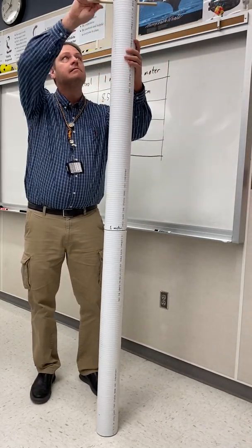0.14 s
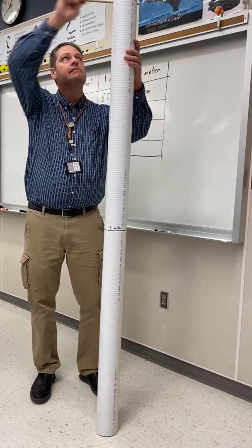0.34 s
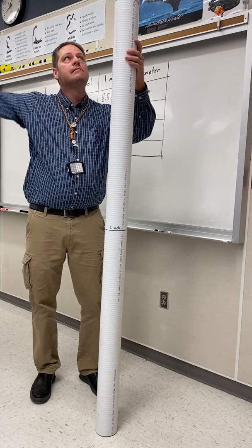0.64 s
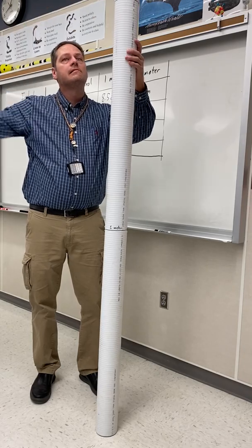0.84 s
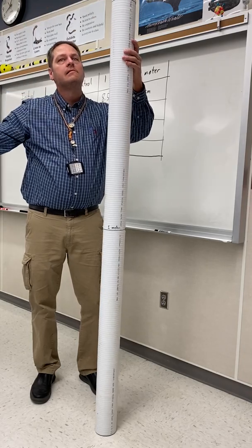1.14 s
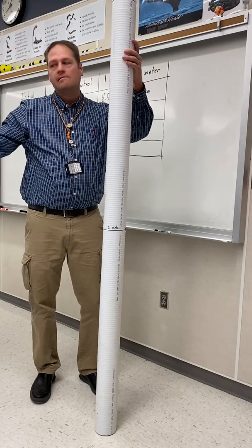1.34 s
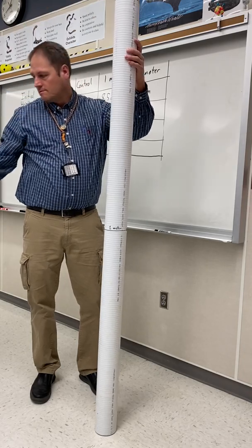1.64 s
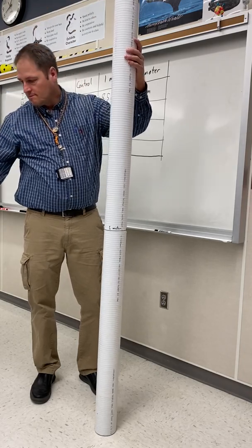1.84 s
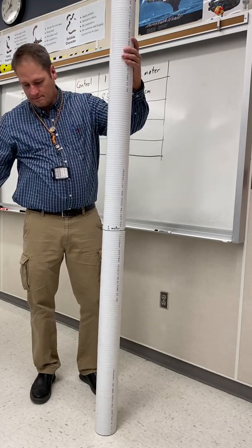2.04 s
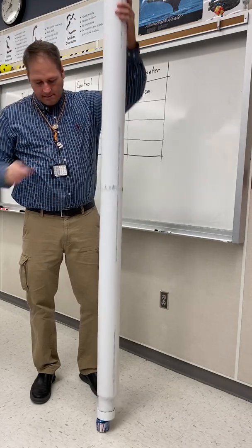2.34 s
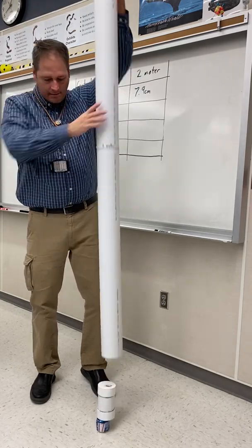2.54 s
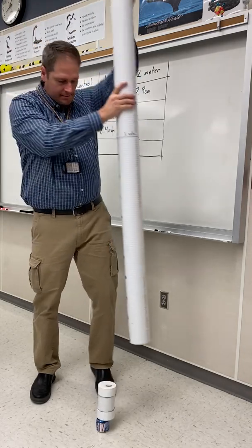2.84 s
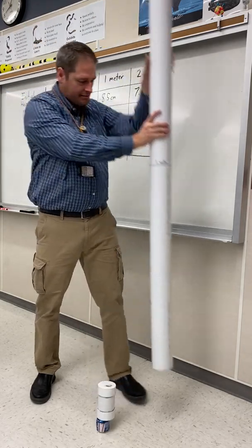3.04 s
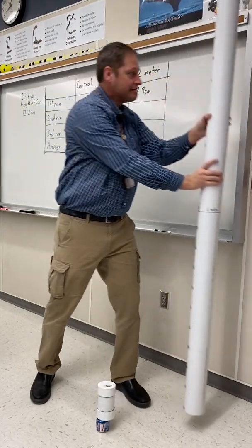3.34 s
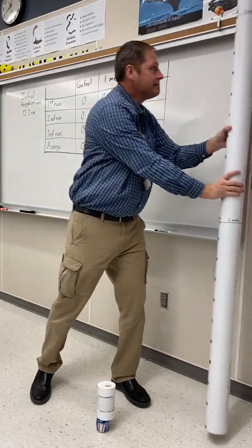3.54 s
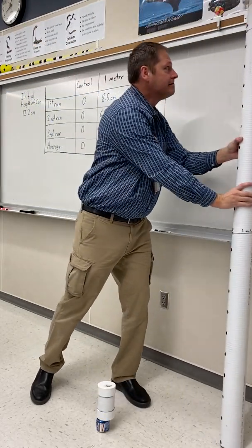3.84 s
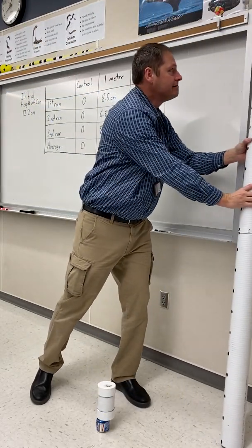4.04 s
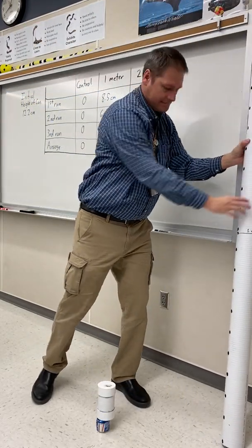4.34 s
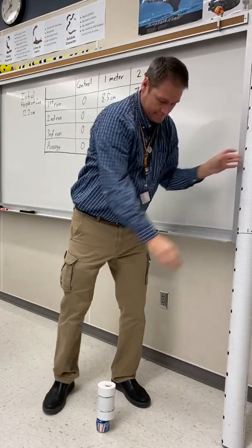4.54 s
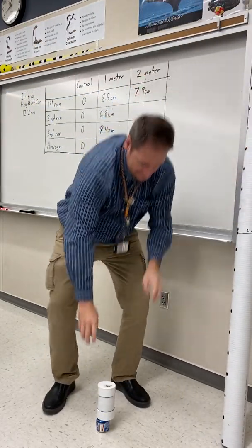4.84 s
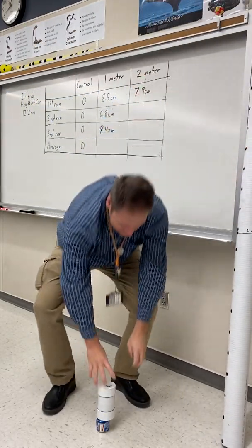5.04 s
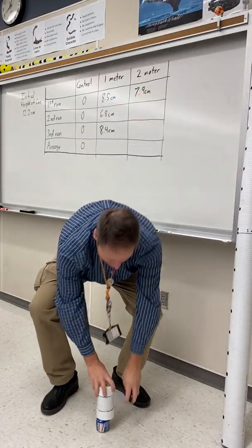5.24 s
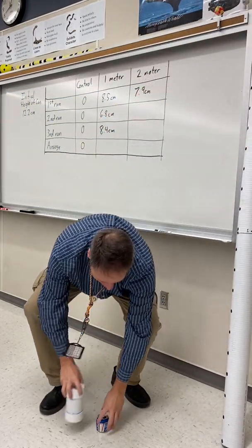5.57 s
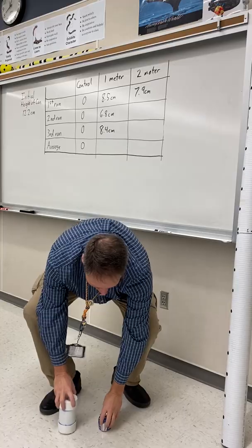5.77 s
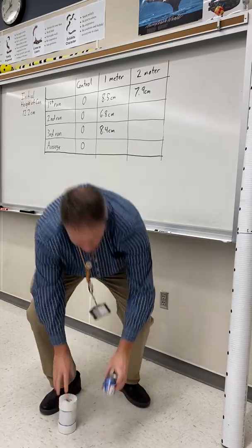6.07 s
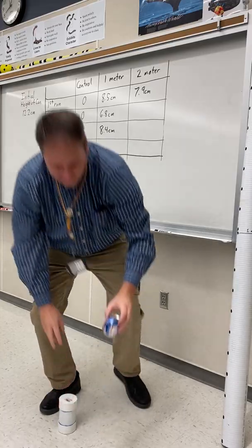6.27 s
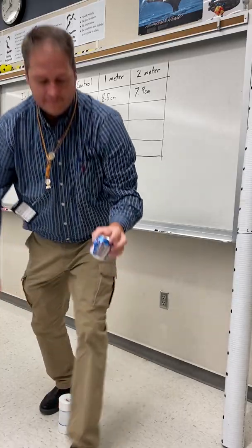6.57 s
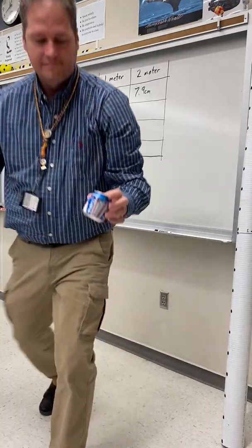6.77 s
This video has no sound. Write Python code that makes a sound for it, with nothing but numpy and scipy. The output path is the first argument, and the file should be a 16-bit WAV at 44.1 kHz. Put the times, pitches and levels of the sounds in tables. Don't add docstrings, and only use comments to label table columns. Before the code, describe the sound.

A hard-walled classroom with steady low ventilation noise and a faint tonal hum. From about 0.35 s a steel peg is jerked out of a tall plastic pipe: stuttering hollow scrapes, a strong rattle near 0.45 and smaller catches to 0.82. At 0.88 a weight slides free, its scrape and pipe resonance swelling quickly, with a wall hit at 1.05, then a very loud crack and crunching thud on a can at 1.12. Rebound blows follow at 1.26 and 1.29 within a ringing room tail. At 1.9 the peg lands, bright and metallic, bouncing until 2.08. From 2.2 come dull pipe scuffs, hollow hums and dry hand rustle; knocks at 3.76-3.94, a thump at 4.14, a sharp scuff at 4.4. The weight is lifted softly at 5.3, the can gripped at 5.77, the weight clacks down at 5.87. Faint knocks and rustle, then tiny can taps at 6.72-6.76.

```python
import sys
import numpy as np
from scipy import signal
from scipy.fft import rfft, irfft, next_fast_len
from scipy.io import wavfile
from scipy.ndimage import uniform_filter1d, map_coordinates

SR = 44100
rng = np.random.default_rng(int(sys.argv[2]) if len(sys.argv) > 2 else 0)


def nominal_scale(level):
    x = np.asarray(level, float) / 20
    return 10 ** x


def dump(signal):
    limited = np.clip(np.atleast_2d(signal).T, -1, 1)
    pcm = np.round(limited * 32767).astype(np.int16)
    wavfile.write(sys.argv[1], SR, pcm)


N = 304731
TIME = np.arange(N) / SR

# (frequency [Hz], density [dB per Hz])
HISS_SPECTRUM = [(3000, -16), (5000, 0.5), (8000, 3), (11000, 4), (14000, 2), (15600, -4), (16100, -51)]
# (frequency [Hz], density [dB per Hz])
SNAP_SPECTRUM = [(1000, -30.5), (2000, 0.5), (3200, 1), (5000, -5), (6800, -15.5), (9000, -28),
                 (13000, -59.5)]
# (frequency [Hz], bandwidth [Hz], level [dB])
PIPE_BODY = [(307, 90, 4), (619, 140, -4), (893, 7.7, -9)]


def unit(x):
    return x / np.sqrt(np.mean(x ** 2) + 1e-20)


def along(points, hz):
    f, v = np.transpose(points)
    return np.interp(np.log(hz + 1), np.log(f + 1), v)


def filtered(x, response):
    m = next_fast_len(x.shape[-1] + 4096)
    hz = np.fft.rfftfreq(m, 1 / SR)
    return irfft(rfft(x, m) * response(hz), m)[..., :x.shape[-1]]


def colour(points):
    return lambda hz: nominal_scale(along(points, hz))


def resonant(modes):
    def response(f):
        total = 0
        for k, (centre, width, db) in enumerate(modes):
            damping = 1j * f * width
            total = total + (-1) ** k * nominal_scale(db) * damping / (centre * centre - f * f + damping)
        return total
    return response


def gritty(clump_hz, depth_db):
    knots = rng.standard_normal(int(N * clump_hz / SR) + 4)
    clumps = map_coordinates(knots, [TIME * clump_hz])
    return rng.standard_normal((2, N)) * nominal_scale(depth_db * clumps)


def patchy(x, bins, frames, depth_db):
    z = signal.stft(x, nperseg=512)[2]
    field = uniform_filter1d(rng.standard_normal(z.shape[1:]), bins, 0)
    field = uniform_filter1d(field, frames, 1)
    return signal.istft(z * nominal_scale(depth_db * unit(field)), nperseg=512)[1][:, :N]


def swell_db(peak_s, rise_s, fade_s):
    return -20 * np.maximum((peak_s - TIME) / rise_s, (TIME - peak_s) / fade_s)


def blows(table, body_modes, snap, t60, sharp, floor_db, brittle_db):
    # (frequency [Hz], bandwidth [Hz], level [dB])
    floor_modes = [(62.5, 31, -9), (135, 47, -6), (175, 27, -2.5)]
    # (frequency [Hz], density [dB per Hz])
    clack_spectrum = [(300, -25), (600, 3), (1100, 0), (1900, -8), (3000, -22), (6000, -68.5)]
    crack_grows = 1.7
    responses = (resonant(floor_modes), resonant(body_modes), colour(clack_spectrum), snap, colour(HISS_SPECTRUM))
    decay_shares = (1.6, .9, .8, .7, .5)
    out, t = np.zeros((2, N + SR)), np.arange(SR // 5) / SR
    for s, db, weight_db, hard_db in table:
        levels = (weight_db + floor_db, weight_db, 0, hard_db, brittle_db + crack_grows * hard_db)
        place = out[:, round(s * SR):][:, :len(t)]
        for response, share, rel_db in zip(responses, decay_shares, levels):
            fall = nominal_scale(-60 * t / (t60 * share)) + sharp * nominal_scale(-60 * t / 0.0039)
            burst = filtered(rng.standard_normal((2, len(t))) * fall, response)
            place += nominal_scale(db + rel_db - 1.88) * burst / np.abs(burst[0]).max()
    return out[:, :N]


def ventilation():
    # (frequency [Hz], density [dB per Hz])
    air_spectrum = [(15, -35.5), (25, -10), (145, 0), (206, -7), (309, -3), (427, -8.5), (607, -13.5),
                    (796, -14.5), (1100, -17), (5430, -35.5), (7310, -48), (10100, -50.5), (16000, -52.5)]
    # (frequency [Hz], bandwidth [Hz], level [dB])
    duct_modes = [(597, 4.7, 8), (1110, 10, 2.5)]

    def duct(hz):
        return colour(air_spectrum)(hz) * (hz < 15900) * (1 + np.abs(resonant(duct_modes)(hz)))

    air = patchy(rng.standard_normal((2, N)), 4, 12, depth_db=2.5)
    return nominal_scale(-60) * unit(filtered(air, duct))


def strokes():
    # (time [s], rustle [dB], rise [s], fade [s], hiss over rustle [dB])
    stroke_events = [(2.21, -61.5, .3, 0.7, -21.5), (2.672, -56, 0.047, 0.28, -1.5),
                     (3.081, -58.5, 0.64, 0.4, .5), (3.2, -61, 0.3, 0.1, -4), (4.37, -66, 0.43, 0.34, -2.5),
                     (4.544, -64.5, 0.059, 0.28, -14), (4.97, -63, 0.35, 1.3, -6.5),
                     (5.338, -67, 0.34, .15, -5), (6.042, -72, 0.16, 0.12, 0.5),
                     (6.192, -75.5, 0.014, 0.13, 9), (6.35, -68.5, 0.35, 1.5, -9.5),
                     (6.724, -63, 0.13, 0.41, -12.5)]
    cloth_from_s, cloth_db, cloth_hiss_db = 2.16, -80, -11
    hiss_grows = 2
    power = nominal_scale(cloth_db + np.array([[0], [cloth_hiss_db]])) ** 2 * (TIME > cloth_from_s)
    for s, db, rise, fade, hiss_db in stroke_events:
        under_db = swell_db(s, rise, fade)
        power = power + nominal_scale(db + np.array([under_db, hiss_db + hiss_grows * under_db])) ** 2
    return np.sqrt(power)


def rubbing():
    # (frequency [Hz], density [dB per Hz])
    rustle_spectrum = [(410, -52), (700, -36.5), (892, -25), (1060, -0.5), (1450, 2), (4310, -1),
                       (6500, -14), (8450, -37.5), (14300, -120)]
    rustle, hiss = strokes()
    grain = gritty(clump_hz=57.4, depth_db=1.0)
    dull = unit(filtered(grain, colour(rustle_spectrum)))
    bright = unit(filtered(grain, colour(HISS_SPECTRUM)))
    return 0.64 * rustle * dull + 1.17 * hiss * bright


def hums():
    # (time [s], frequency [Hz], level [dB], swell [s], t60 [s])
    tones = [
        (1.12, 68.5, -27, 0.0096, .08),
        (1.931, 175, -37.5, 0.013, 0.14),
        (2.19, 432, -42, 0.02, 0.2),
        (2.33, 358, -45.5, 0.016, 0.14),
        (2.434, 360, -35, 0.039, 0.094),
        (2.474, 361.8, -46.5, 0.061, 0.18),
        (3.775, 60.5, -44.5, 0.035, 0.28),
        (4.152, 62.7, -41, 0.05, 0.15),
        (4.564, 251, -35, 0.0069, 0.034),
    ]
    out = np.zeros(N)
    for s, hz, db, swell, t60 in tones:
        t = np.maximum(TIME - s, 0)
        envelope = nominal_scale(db - 60 * np.maximum(t - swell, 0) / t60) * np.minimum(t / 0.019, 1)
        out += envelope * np.sin(2 * np.pi * hz * t)
    return out * np.array([[1], [.6]])


def pipe_contacts():
    # (time [s], clack peak [dB], weight [dB], hardness [dB])
    rattles = [
        (.449, -30.5, -11.5, -13),
        (.607, -42.5, -2.5, 3.5),
        (.737, -36, -12.5, -16),
        (.817, -34.5, -3, -13),
    ]
    scuffs = [
        (2.195, -45, 2.5, -12),
        (2.308, -45.5, 2.5, -12),
        (2.337, -41.5, -9, -6),
        (2.407, -45, 1, 2),
        (4.13, -44.5, 5, -2.5),
        (4.392, -35, -1, 1),
        (4.409, -43.5, 0.5, -13.5),
    ]
    knocks = [
        (3.763, -37.5, -5, -7.5),
        (3.768, -33.5, -3, -4.5),
        (3.844, -32, -1, -10.5),
        (3.853, -30, 4.5, -14),
        (3.893, -36.5, 2, -34.5),
        (3.94, -43, 7, -30.5),
        (4.144, -42, 6, -2.5),
        (4.564, -49.5, 6, -16),
        (6.221, -48, -3, -17),
    ]
    snap = colour(SNAP_SPECTRUM)
    return (blows(scuffs, PIPE_BODY, snap, t60=0.27, sharp=0.46, floor_db=-4.5, brittle_db=-6.5)
            + blows(knocks, PIPE_BODY, snap, t60=0.15, sharp=0.52, floor_db=-11, brittle_db=-7.5)
            + blows(rattles, PIPE_BODY, snap, t60=0.26, sharp=1.5, floor_db=-15, brittle_db=-20))


def hard_contacts():
    # (time [s], clack peak [dB], weight [dB], hardness [dB])
    landings = [
        (1.897, -34, -5.5, 11),
        (1.92, -42, -5, 1),
        (1.964, -39, -10, 6.5),
        (2.03, -38.5, -11, .6),
    ]
    clicks = [
        (2.467, -49, -2.5, 11),
        (6.19, -62, 2, 3.4),
    ]
    snap = colour(SNAP_SPECTRUM)
    return (blows(clicks, PIPE_BODY, snap, t60=0.16, sharp=3.4, floor_db=-6.5, brittle_db=-2)
            + blows(landings, PIPE_BODY, snap, t60=0.313, sharp=2.9, floor_db=-9.5, brittle_db=-28))


def can_contacts():
    # (frequency [Hz], bandwidth [Hz], level [dB])
    can_wall = [(2020, 83, 6), (4850, 200, 0), (5640, 210, -1)]
    # (time [s], clack peak [dB], weight [dB], hardness [dB])
    grips = [
        (5.767, -50.5, -26, 4.4),
        (5.79, -52, -21, 6.3),
    ]
    taps = [
        (6.722, -60, 6, 11.4),
        (6.76, -53.5, -5, 1.5),
    ]
    wall = resonant(can_wall)
    return (blows(taps, PIPE_BODY, wall, t60=0.06, sharp=2.5, floor_db=2, brittle_db=-33)
            + blows(grips, PIPE_BODY, wall, t60=0.27, sharp=.2, floor_db=20, brittle_db=-9.5))


def weight_contacts():
    # (frequency [Hz], bandwidth [Hz], level [dB])
    casing = [(1990, 470, 0.5), (3200, 440, 4), (5520, 1700, -6.5)]
    # (time [s], clack peak [dB], weight [dB], hardness [dB])
    lifts = [
        (5.27, -50, -12, -10),
        (5.326, -44.5, -10, 1),
        (5.345, -54, -13.5, 4.5),
    ]
    set_down = [
        (5.863, -55, -12, 4),
        (5.874, -33.5, -3.5, 9.4),
        (5.89, -43, -2, 8.9),
    ]
    shell = resonant(casing)
    return (blows(set_down, PIPE_BODY, shell, t60=0.14, sharp=3.6, floor_db=-5.5, brittle_db=-18.5)
            + blows(lifts, PIPE_BODY, shell, t60=0.28, sharp=.3, floor_db=-15, brittle_db=-22))


def peg():
    # (time [s], level [dB])
    bounces = [
        (1.897, -33.5),
        (1.964, -39),
        (2.03, -54),
        (2.075, -74.5),
    ]
    # (frequency [Hz], level [dB], t60 [s])
    peg_modes = [(2090, -16.5, 0.11), (3220, -5, 0.37), (3480, -8, 0.077), (4780, -5, 0.091),
                 (4980, 1.5, 0.16), (5800, 0, 0.082), (7100, -2.5, 0.13), (9130, -11, 0.151),
                 (9540, -17, 0.14), (11620, -15, 0.088)]
    chatter_hz, chatter_db = 68, 3.5
    contact_s = 0.00051
    out, t = np.zeros((2, N + SR)), np.arange(SR * 2 // 5) / SR
    onset = 1 - np.exp(-t / contact_s)
    for s, db in bounces:
        place = out[:, round(s * SR):][:, :len(t)]
        for hz, mode_db, t60 in peg_modes:
            wander = uniform_filter1d(np.cumsum(rng.standard_normal(len(t))), size=60)
            phase = rng.uniform(0, 2 * np.pi, (2, 1)) + 0.085 * wander
            rocking_db = chatter_db * map_coordinates(rng.standard_normal(SR // 100), [t * chatter_hz])
            envelope = nominal_scale(db + mode_db + rocking_db - 60 * t / t60) * onset
            place += envelope * np.sin(2 * np.pi * hz * t + phase)
    return out[:, :N]


def contact():
    # (time [s], strength [dB], rise [s], fade [s], brightness [dB])
    jerks = [
        (0.341, -58, .03, 0.13, 9),
        (.382, -45.5, 0.053, 0.14, -1),
        (.435, -47, .05, 0.061, 3),
        (0.467, -35, 0.054, 0.059, -2.5),
        (.56, -51, .03, .06, 4),
        (.615, -49, .02, 0.049, -10),
        (0.662, -44, 0.033, 0.063, -0.5),
        (0.755, -42, 0.025, 0.088, 2),
        (0.819, -42.5, 0.017, 0.027, -3.5),
    ]
    speed_db = [(-9.5,), (9.5,), (5,), (5,)]
    layer_db = [(3.5,), (-0.5,), (0,), (-20,)]
    drop_s, land_s, catch_s = .875, 1.104, 0.014
    fall_strength_db, fall_bright_db = -34, 0
    peg_out_s, held_db = .6, -8
    grows = np.array([[0.85], [5.4], [1], [1]])
    bright = np.array([[0], [0], [0], [1]])
    power = 0
    for s, db, rise, fade, bright_db in jerks:
        power = power + nominal_scale(db + grows * swell_db(s, rise, fade) + bright * bright_db) ** 2
    power[0] *= nominal_scale(2 * held_db * (TIME < peg_out_s))
    speed = np.clip((TIME - drop_s) / (land_s - drop_s), 0, 1)
    fall_db = fall_strength_db + bright * fall_bright_db + np.array(speed_db) * speed
    fall_db = fall_db + swell_db(drop_s, catch_s, np.inf)
    return nominal_scale(layer_db) * np.sqrt(power + nominal_scale(fall_db) ** 2 * (TIME < land_s))


def slide():
    # (frequency [Hz], bandwidth [Hz], level [dB])
    wall_modes = [(370, 110, 0), (575, 170, 0)]
    # (frequency [Hz], density [dB per Hz])
    scrape_spectrum = [(350, -47), (600, -1), (876, -3), (1010, -3), (2110, -10.5), (3540, -15.5),
                       (4920, -18.5), (6500, -32.5), (8450, -57), (14300, -120)]
    low, high, scrape, fizz = contact()
    chatter = patchy(gritty(clump_hz=161.5, depth_db=3.0), 3, 4, depth_db=4.5)
    rings = [unit(filtered(chatter, lambda f: resonant([mode])(f) ** 2)) for mode in wall_modes]
    rub = scrape * unit(filtered(chatter, colour(scrape_spectrum)))
    rub = rub + fizz * 1.27 * unit(filtered(chatter, colour(HISS_SPECTRUM)))
    return 0.75 * low * rings[0] + 0.38 * high * rings[1] + 0.75 * rub


def slam():
    # (time [s], clack peak [dB], weight [dB], hardness [dB])
    slam_blows = [
        (1.045, -19, -5.5, -17.5),
        (1.104, -23.5, -16.5, -5),
        (1.11, -14.5, -18, -9),
        (1.1172, -9, -19, 3.5),
        (1.119, -16.5, 12, -2),
        (1.262, -22.5, -5.5, -4),
        (1.29, -26, -1, -6.5),
    ]
    # (frequency [Hz], bandwidth [Hz], level [dB])
    can_body = [(335, 120, 2.5), (495, 70, 3.5), (630, 92, 2.5), (1910, 500, -10)]
    return blows(slam_blows, can_body, colour(SNAP_SPECTRUM), t60=0.065, sharp=3.8, floor_db=-20, brittle_db=-2)


def room(x):
    # (frequency [Hz], t60 [s])
    decay = [(100, 0.87), (500, 0.73), (2000, 0.49), (5000, 0.48), (11000, 0.26)]
    hz, t, z = signal.stft(rng.standard_normal((4, 2, SR * 2 // 3)), SR, nperseg=256)
    tails = signal.istft(z * nominal_scale(-60 * t / along(decay, hz)[:, None]), SR, nperseg=256)[1]
    tails /= np.linalg.norm(tails[0, 0])
    out, hop = np.zeros((2, N + 2 * SR)), SR // 5
    for k, at in enumerate(range(0, N, hop)):
        wet = signal.fftconvolve(x[None, at:at + hop], tails[k % len(tails)], axes=1)
        out[:, at + 300:][:, :wet.shape[1]] += wet
    return out[:, :N]


def scene():
    rattle, impact = slide(), slam()
    handling = pipe_contacts() + hard_contacts() + can_contacts() + weight_contacts() + peg() + hums()
    wet = room(nominal_scale(-10) * rattle[0] + nominal_scale(-1.0) * impact[0] + nominal_scale(-10.5) * handling[0])
    return rattle + impact + handling + wet + rubbing() + ventilation()


def band_limit(x):
    return signal.sosfilt(signal.butter(12, 17140, fs=SR, output="sos"), x)


def record(dry):
    # (frequency [Hz], coherence [1])
    likeness = [(60, .995), (200, 0.98), (400, 0.75), (800, 0.21), (2500, .5), (4500, 0.45), (7000, 1),
                (15000, 0.73)]
    # (frequency [Hz], phase [rad])
    port_lead = [(0, 0), (1700, 0), (3000, .8), (4800, .5), (7500, 3.14), (10500, 6.28), (13500, 9.42),
                 (16500, 12.6)]
    # (time [s], gain [dB])
    duck = [
        (1.11, 5),
        (1.135, 1),
        (1.23, -6),
        (1.29, 0.5),
        (1.45, 4),
    ]
    mic_top_hz = 16300

    def mixing(hz):
        turn = np.arccos(np.clip(along(likeness, hz), -1, 1)) / 2
        return np.array([np.cos(turn), np.sin(turn)])

    def lead(hz):
        return np.exp(.5j * np.interp(hz, *np.transpose(port_lead)) * np.array([[1], [-1]]))

    shared, apart = filtered(dry, mixing)
    ports = filtered(np.array([shared + apart, shared - apart]), lead) * nominal_scale(np.array([[-.4], [.4]]))
    ducked = ports * nominal_scale(np.interp(TIME, *np.transpose(duck)))
    rounded = ducked / (1 + np.abs(ducked / .92) ** 6) ** (1 / 6)
    rounded = filtered(rounded, lambda hz: 1 / (1 + (hz / mic_top_hz) ** 40))
    return band_limit(rounded)


dry = scene()
out = record(dry)
dump(out)
```